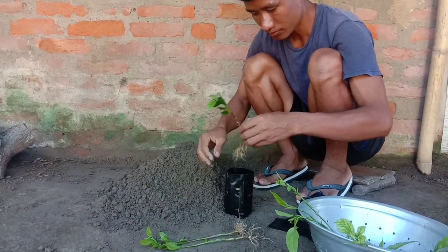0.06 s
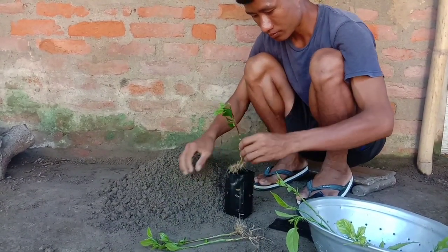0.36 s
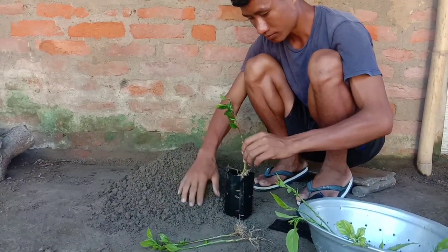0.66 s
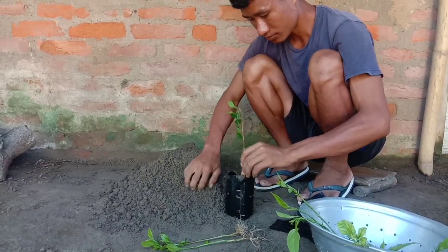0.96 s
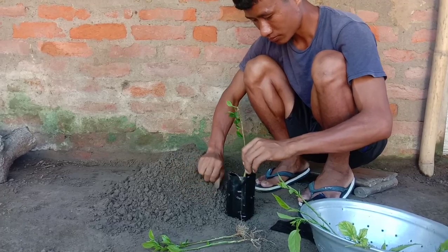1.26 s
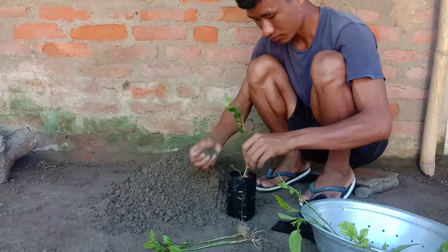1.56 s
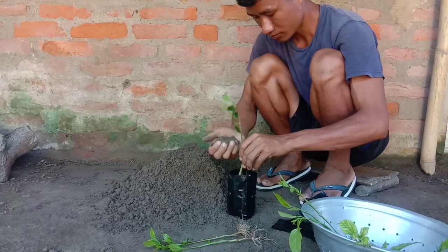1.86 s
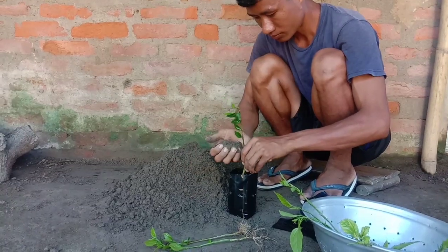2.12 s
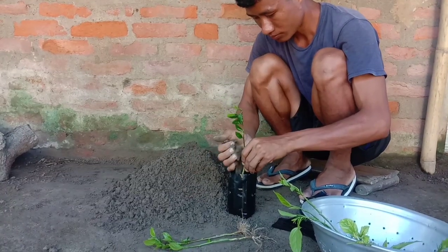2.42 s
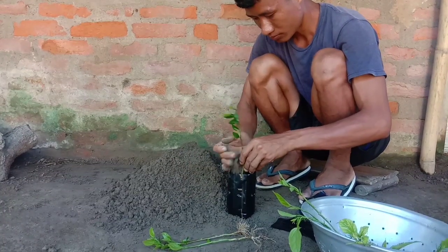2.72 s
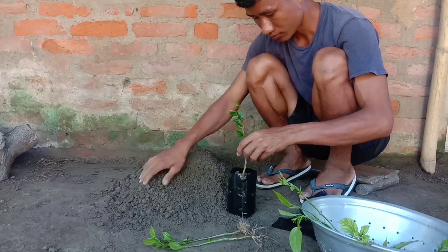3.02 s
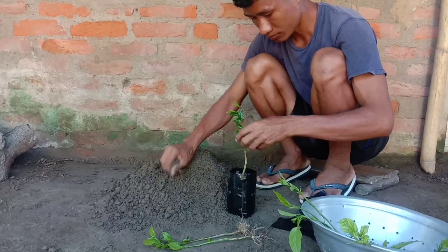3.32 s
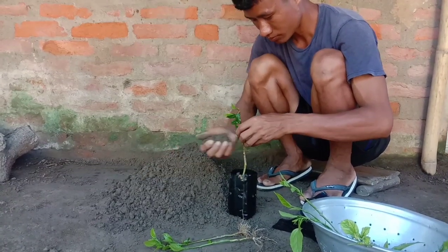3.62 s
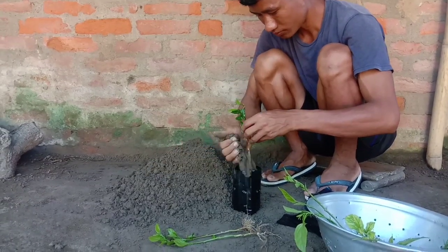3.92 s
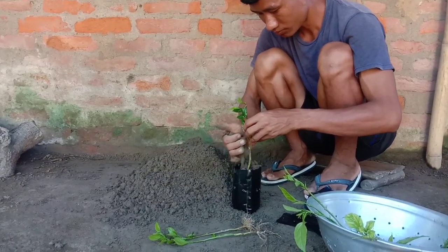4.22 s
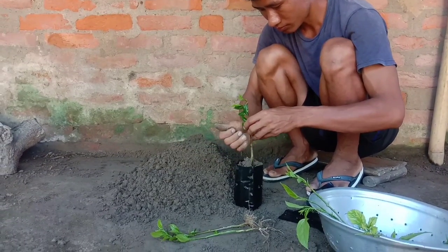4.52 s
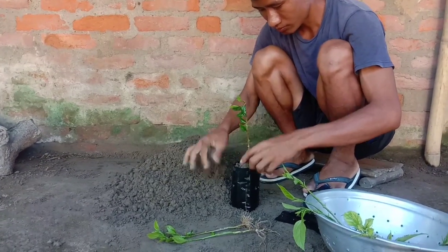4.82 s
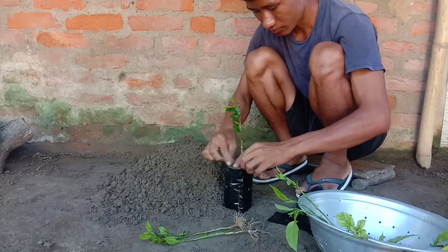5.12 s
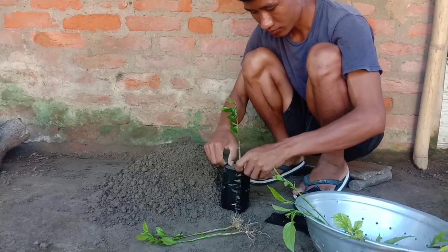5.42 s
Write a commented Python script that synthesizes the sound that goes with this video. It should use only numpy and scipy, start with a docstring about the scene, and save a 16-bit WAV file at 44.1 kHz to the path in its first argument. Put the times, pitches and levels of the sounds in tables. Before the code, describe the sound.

From start to finish, about five and a half seconds, a small bird repeats a sharp falling chip roughly four times a second, steady in level, with tight echoes off garden walls. Close by, hands scoop and crumble loose soil in soft, uneven, gritty strokes, busiest from 2.5 to 4.2 seconds. A thin plastic planting bag gives short bright crinkles near 0.5, 1, 1.6 to 2, 4, 4.5 and 5 seconds. Hands and clods thud softly on packed earth at 1 second and most clearly at 3.6. Faint high peeps and twitter come in the first 1.3 seconds and again from 3.7 to 4.6. Distant birds hoot briefly, mostly after 3.6 seconds. From 4.8 seconds a second bird answers with about five thin, slightly raspy falling whistles. Faint shrill insects, a soft hush and a wandering low rumble lie underneath. The sound is almost mono.

```python
"""A walled garden: a small bird repeats one sharp falling chip about four times a second, each a pure
glide that beats against its echoes off ground and walls. A thin whistler answers late.
Close by, hands scoop loose soil and crumble it into a plastic planting bag: grains rub and hiss,
clods knock softly, the bag crinkles. Faint peeps, far hoots, insects and a low rumble lie behind.
The sound is almost mono."""
import sys
import numpy as np
from scipy import signal
from scipy.fft import rfft, irfft
from scipy.io import wavfile
from scipy.ndimage import uniform_filter1d

SR = 44100
rng = np.random.default_rng(int(sys.argv[2]) if len(sys.argv) > 2 else 0)


def store_wav(level_fs):
    """Save 16-bit WAV to argv[1]."""
    pcm = np.round(np.clip(np.atleast_2d(level_fs), -1, 1) * 32767)
    wavfile.write(sys.argv[1], SR, pcm.T.astype(np.int16))


N = 245637
TIME = np.arange(N) / SR


# the lead bird's chips: t/s, level/dB, pitch/ratio, extra bend over the fall/ratio
CHIP_CUES = [(0.1898, -39.9, 0.992, 0.011), (0.4739, -39.2, 1.01, 0.01), (0.7326, -40.0, 0.993, -0.006),
             (1.0133, -40.2, 0.992, 0.006), (1.2725, -39.5, 0.996, -0.001), (1.5233, -39.7, 0.993, 0.009),
             (1.7992, -39.4, 0.997, 0.038), (2.0513, -40.5, 0.979, -0.022), (2.3358, -39.5, 1.004, -0.009),
             (2.601, -40.1, 1.0, -0.018), (2.8548, -40.3, 0.99, 0.008), (3.1395, -40.0, 0.991, 0.001),
             (3.3982, -39.0, 1.007, -0.004), (3.6646, -39.8, 1.0, -0.01), (3.9214, -39.8, 0.988, 0.035),
             (4.1877, -39.8, 1.005, -0.031), (4.4501, -39.4, 1.024, -0.026), (4.7247, -41.4, 0.972, 0.054),
             (4.9785, -38.5, 1.02, -0.03), (5.2329, -37.3, 1.003, 0.025), (5.5006, -38.8, 1.03, -0.013)]
def chipping_bird(boost_db=4.5, lead_s=.0125):
    """A run of near-identical chips, each led in by a thin slur."""
    song, drift = np.zeros(N), 1 + .003 * walk(300)
    for s, db, pitch, slope in CHIP_CUES:
        add(song, s - lead_s, undb(db) * lead_in(pitch, lead_s))
        add(song, s, undb(db + boost_db) * chip(pitch, slope, np.roll(drift, -int(s * SR))))
    out = reflections(song)
    # the song is already under way: open on the ring-out of a chip
    add(out, 0, out[int(.255 * SR):int(.44 * SR)].copy())
    return out


def chip(pitch, slope, drift, rest_hz=1952, attack_s=.0018, fall_s=.0435, trail_s=.036):
    """A whistle plunges, sags toward a resting pitch as it fades, flicks up and leaves a faint trail."""
    t = TIME[:int((fall_s + trail_s) * SR)]
    plunge_hz = 1350 * np.exp(-t / .00199)
    sag_hz = 1103 * np.exp(-t / .0235)
    flick = np.exp(-((t - .0421) / .0018) ** 2)
    hz = rest_hz + plunge_hz + sag_hz + 140 * flick
    bend = 1 + slope * (np.minimum(t / fall_s, 1) - .3)
    fade_db = -390 * np.minimum(t, fall_s)
    trail_db = -7 * np.clip((t - fall_s) / attack_s, 0, 1)
    gate = np.minimum(t / attack_s, 1) * np.sqrt(np.clip((t[-1] - t) / trail_s, 0, 1))
    return tone(pitch * bend * hz * drift[:len(t)], undb(fade_db + 11 * flick + trail_db) * gate)


def lead_in(pitch, length_s, start_hz=5960, end_hz=4108):
    """A thin slur that falls ever faster and grows until the chip takes over."""
    n = int(length_s * SR)
    hz = start_hz + (end_hz - start_hz) * np.linspace(0, 1, n) ** 1.75
    gain = undb(np.linspace(-21, -6, n)) * signal.windows.tukey(n, .15)
    return tone(pitch * hz, gain)


# early reflections off ground and walls: delay/s, level/dB
WALL_TAPS = [(.00138, -9.1), (.00227, -7.5), (.00638, -5.7), (.00869, -8.9), (.01097, -11.4),
             (.01275, -10.3), (.01671, -11.6), (.01792, -11), (.01923, -9.2), (.02165, -11),
             (.03493, -12.6), (.04737, -11.1)]
def reflections(song, leaves_hz=2750, weak_taps=7):
    """Echoes overlap each glide and make it beat; leaves scatter mostly its high start."""
    bright = 2 * signal.sosfilt(signal.butter(3, leaves_hz, "highpass", fs=SR, output="sos"), song)
    out = song + scatter(bright, wet_db=-5.5)
    for delay, db in WALL_TAPS:
        add(out, delay, undb(db) * song)
    for k, chance in enumerate(rng.random(weak_taps)):  # smaller surfaces, 14-36 ms late
        add(out, .014 + .022 * (k + chance) / weak_taps, undb(-16) * song)
    return out


# EQ of dull, crumbling soil: f/Hz, level/dB
SCRAPE_EQ = [(120, -40), (230, -15.5), (320, 1), (370, 2), (440, 3.5), (520, -2.5), (780, -3), (950, -2.5),
             (1150, -0.5), (1500, -3.5), (2000, -4), (4000, -12.5), (7500, -43), (11000, -49)]
# EQ of bright grit, also used for the bag: f/Hz, level/dB
GRIT_EQ = [(1500, -15), (3200, -12.5), (4500, -4), (6200, 7), (7500, 2.5), (9000, -13), (11500, -26.5),
           (15500, -28)]
# hand strokes through the soil: peak t/s, length/s, scrape level/dB, grit level/dB
HAND_STROKES = [(0.262, 0.085, -62, -61), (0.518, 0.11, -74, -54), (0.636, 0.038, -58, -52.5),
                (0.757, 0.2, -78, -59), (1.002, 0.13, -59.5, -54.5), (1.094, 0.16, -61.5, -56),
                (1.283, 0.24, -69.5, -57.5), (1.54, 0.15, -69, -55), (1.815, 0.17, -62, -49.5),
                (1.988, 0.076, -65.5, -57), (2.076, 0.088, -65.5, -52), (2.385, 0.2, -65, -53.5),
                (2.543, 0.063, -59, -52), (2.766, 0.071, -54.5, -50), (2.816, 0.11, -54.5, -48.5),
                (2.951, 0.33, -60, -55), (3.45, 0.12, -82, -54.5), (3.589, 0.041, -51, -66),
                (3.663, 0.21, -54.5, -51.5), (3.934, 0.079, -57, -50.5), (4.02, .16, -53, -49.5),
                (4.157, 0.47, -68.5, -56), (4.405, 0.064, -57.5, -66), (4.528, 0.21, -67.5, -57.5),
                (4.817, 0.19, -72, -57.5), (4.925, 0.037, -69, -60.5), (5.01, 0.093, -64.5, -54.5),
                (5.133, 0.031, -57.5, -55), (5.247, 0.043, -85, -53), (5.346, 0.065, -59, -55),
                (5.53, 0.21, -60.5, -58)]
def soil(scrape_db=-1, grit_db=-3, lumpy_db=3):
    """Crumbs rub past each other in small slips: dull grains from the heap, bright ones from sand."""
    scrape = colour(grains(rate=9000, spread_db=1), SCRAPE_EQ) * undb(lumpy_db * walk(70) + scrape_db)
    grit = colour(grains(rate=7000, spread_db=1), GRIT_EQ) * undb(1.5 * walk(110) + grit_db)
    return sum(swell(s, length, rise_share=.41) * (undb(dull_db) * scrape + undb(hiss_db) * grit)
               for s, length, dull_db, hiss_db in HAND_STROKES)


# crinkles of the bag: t/s, level/dB, t60/s
CRINKLE_CUES = [(0.4803, -37.5, 0.079), (0.5302, -41, 0.057), (0.624, -40, 0.069), (0.9856, -33, 0.047),
                (1.635, -37.5, 0.024), (1.7804, -38, 0.065), (1.8193, -44, 0.077), (1.954, -42, 0.093),
                (2.0157, -37, 0.076), (2.582, -42, 0.21), (2.7786, -54, 0.06), (2.826, -43, 0.026),
                (3.997, -37, 0.05), (4.0452, -36, 0.06), (4.418, -36, 0.076), (4.4553, -29, 0.036),
                (4.9272, -44, 0.088), (4.992, -32, 0.036), (5.1244, -30.5, 0.04), (5.3213, -47, 0.099)]
def plastic_bag(trim_db=-10, attack_s=.0025):
    """The thin plastic gives short bursts of bright crackle."""
    out, t = np.zeros(N), TIME[:SR // 3]
    crackle = colour(grains(rate=9000, spread_db=1.5), GRIT_EQ)
    for s, db, t60 in CRINKLE_CUES:
        burst = undb(db + trim_db) * np.minimum(t / attack_s, 1) * decay(t, t60)
        add(out, s, np.roll(crackle, -int(s * SR))[:len(t)] * burst)
    return out


# body of a thud on packed earth: f/Hz, level/dB, t60/s
THUD_MODES = [(114, -1, 0.13), (195, 10, 0.031), (237, -6.5, 0.18), (420, -24, 0.052)]
# soft hits: t/s, crumb level/dB, crumb t60/s, thud level/dB
KNOCK_CUES = [(0.231, -78, 0.41, -74), (0.531, -54.5, 0.096, -78), (0.998, -55.5, 0.4, -46.5),
              (1.821, -52, 0.11, -58), (2.53, -52.5, 0.21, -79), (2.763, -67, 0.096, -53),
              (2.821, -59, .08, -56), (2.932, -41.5, 0.046, -74), (3.564, -56, 0.17, -35),
              (3.656, -55, 0.093, -45), (3.934, -60, 0.47, -76), (4.417, -75, 0.17, -57),
              (4.973, -47, 0.037, -77), (5.133, -51, 0.069, -77), (5.333, -53.5, 0.058, -78)]
def knocks(attack_s=.0074):
    """Hand and clods land on packed earth: a soft thud with a spill of crumbs."""
    out, t = np.zeros(N), TIME[:SR // 3]
    thud = sum(undb(db) * np.sin(2 * np.pi * hz * t) * decay(t, t60) for hz, db, t60 in THUD_MODES)
    for s, crumbs_db, t60, thud_db in KNOCK_CUES:
        crumbs = colour(noise(len(t)), SCRAPE_EQ) * undb(crumbs_db) * decay(t, t60)
        add(out, s, (crumbs + undb(thud_db) * thud) * np.minimum(t / attack_s, 1))
    return out


# the answering phrase: t/s, length/s, start f/Hz, end f/Hz, level/dB
WHISTLE_NOTES = [(4.79, 0.14, 5360, 3844, -43.5), (4.795, 0.035, 7600, 7200, -54.5),
                 (4.98, 0.13, 5160, 3385, -43), (5.048, 0.045, 7860, 7450, -59),
                 (5.15, 0.12, 4910, 3780, -41.5), (5.227, 0.033, 7760, 7250, -57.5),
                 (5.353, 0.05, 4840, 4490, -43), (5.385, 0.065, 4500, 3860, -36.5),
                 (5.427, 0.036, 7650, 7160, -52.5), (5.545, 0.063, 4950, 4200, -40)]
def whistler():
    """A second bird answers with thin, slightly raspy falling whistles."""
    song = slurs(WHISTLE_NOTES, waver=.02, rate=600)
    return song + scatter(song, wet_db=-3)


# faint high peeps: t/s, level/dB
PEEP_CUES = [(0.056, -61), (0.274, -49.5), (.68, -53.5), (0.898, -52.5), (.935, -51), (1.122, -52),
             (1.16, -51.5), (3.691, -49.5), (3.874, -52), (4.097, -51.5), (4.135, -51), (4.316, -50),
             (4.363, -52.5), (4.534, -54)]
def peeps(length_s=.0282, start_hz=5950, end_hz=5200):
    """Tiny raspy down-glides, blurred by distance."""
    song = slurs([(s, length_s, start_hz, end_hz, db) for s, db in PEEP_CUES], waver=.04, rate=900)
    return song + scatter(song, wet_db=-2)


# distant calls: t/s, length/s, start f/Hz, end f/Hz, level/dB
HOOT_NOTES = [(0, 0.071, 662, 614, -69), (1.16, 0.082, 1272, 1224, -58.5), (2.36, 0.11, 1236, 1131, -60.5),
              (3.655, 0.073, 1260, 1200, -54.5), (3.7, 0.089, 1338, 1230, -46),
              (3.975, 0.086, 1043, 1043, -50.5), (4.18, 0.051, 1048, 964, -58.5),
              (4.2, 0.082, 1460, 1515, -63.5), (4.515, 0.089, 1162, 1206, -55), (4.63, 0.11, 613, 604, -69),
              (4.71, 0.093, 1226, 1276, -61), (4.875, 0.14, 1336, 1221, -54.5),
              (5.17, 0.097, 1487, 1538, -60), (5.3, 0.098, 1518, 1344, -53.5)]
def hoots(boost_db=1):
    """Far birds hoot on nearly level pitches; much of it arrives as scatter."""
    song = slurs(HOOT_NOTES, waver=.01, rate=120)
    return undb(boost_db) * (song + scatter(song, wet_db=-2))


# bouts of twitter behind the peeps: start t/s, end t/s, level/dB
TWITTER_BOUTS = [(0.242, 0.452, -62), (0.663, 1.27, -59), (3.85, 4.6, -59)]
def twitter(notes_per_s=44, note_s=.0305, start_hz=5900, end_hz=5160, spread_db=3):
    """Quick high notes from far off, loose in timing and level."""
    beats = [(s, db) for start, end, db in TWITTER_BOUTS for s in np.arange(start, end, 1 / notes_per_s)]
    notes = [(s + late / notes_per_s / 4, note_s, start_hz, end_hz, db + spread_db * louder)
             for (s, db), (late, louder) in zip(beats, noise((400, 2)))]
    song = slurs(notes, waver=.02, rate=900)
    return .5 * song + scatter(song, wet_db=-9)


# envelope of the garden's reverb: delay/s, level/dB
REVERB_ENVELOPE = [(0, -8), (.012, -2), (.035, -3), (.07, -2), (.1, -7), (.15, -15), (.22, -25), (.45, -52)]
def scatter(x, wet_db):
    """Leaves and walls return the sound as a short diffuse tail."""
    envelope = undb(curve(REVERB_ENVELOPE)[:SR // 2])
    tail = noise(len(envelope)) * envelope
    return undb(wet_db) * signal.fftconvolve(x, tail / np.linalg.norm(tail))[:N]


# fader ride of the shrill insect: t/s, level/dB
INSECT_RIDE = [(0, -68.5), (.2, -65), (.3, -94), (2.3, -79), (3.1, -70.5), (4.5, -70), (5.57, -69.5)]
def insects(chorus_db=-67):
    """Two flickering bands of noise: one narrow and shrill, one a broader chorus."""
    shrill = noise_band(hz=8970, width=330) * undb(curve(INSECT_RIDE) + 2 * walk(25))
    chorus = noise_band(hz=7270, width=1000) * undb(chorus_db + 4.1 * walk(8.3))
    return shrill + chorus


# low-end swells: peak t/s, length/s, level/dB
RUMBLE_SWELLS = [(0.125, 0.34, -52.5), (0.796, 0.1, -58), (1.163, 0.78, -59.5), (1.926, .22, -60),
                 (2.327, 0.074, -54), (2.865, 0.12, -54.5), (4.32, 0.14, -56.5), (4.738, 0.11, -52),
                 (5.093, 0.11, -59), (5.449, 0.12, -49)]
def rumble(steady_db=-69.5, swell_trim_db=-3):
    """A low rumble that wanders in level and now and then swells into a hum."""
    bed = noise_band(hz=115, width=99) * undb(steady_db + 2 * walk(8))
    hum = unit(resonate(noise_band(hz=114, width=125), hz=114, width=125))
    swells = sum(undb(db) * swell(s, length, rise_share=.49) for s, length, db in RUMBLE_SWELLS)
    return bed + hum * swells * undb(swell_trim_db)


# EQ of the air bed: f/Hz, level/dB
AIR_EQ = [(30, -10), (70, 13), (150, 12), (330, 4.5), (520, 1.5), (900, -1.5), (1800, 1.5), (2500, 3),
          (4000, -8.5), (5000, -8.5), (6200, 6.5), (8000, -38), (9600, -11.5), (10300, -5.5), (11300, -21),
          (13800, -22), (15400, -11)]
def still_air(air_db=-67, tone_db=-72, side_db=-78):
    """A soft hush with a wavering far-off tone and a trace of stereo width."""
    hush = colour(noise(), AIR_EQ) * undb(air_db + .5 * walk(2.35))
    far_tone = noise_band(hz=1181, width=107) * undb(tone_db + 1.8 * walk(3.9))
    side_eq = [(50, 7), (120, 5), (300, 4), (600, -1), (1200, 10), (2500, -17.5), (5000, -5.5),
               (9000, -41), (15000, -3.5)]  # f/Hz, level/dB
    return hush + far_tone + side(colour(noise(), side_eq) * undb(side_db))


def slurs(notes, waver, rate):
    """Whistled glides that swell and fade; a fast waver of the pitch makes them raspy."""
    out, drift = np.zeros(N), 1 + waver * walk(rate)
    for s, length, start_hz, end_hz, db in notes:
        n = int(length * SR)
        hz = np.geomspace(start_hz, end_hz, n) * np.roll(drift, -int(s * SR))[:n]
        add(out, s, tone(hz, undb(db) * signal.windows.tukey(n, .8)))
    return out


def tone(hz, gain):
    """A pure whistle on a moving pitch."""
    return gain * np.sin(2 * np.pi * np.cumsum(hz) / SR)


def grains(rate, spread_db):
    """Random tiny clicks, a few larger than the rest."""
    clicks = (rng.random(N) < rate / SR) * noise()
    return clicks * undb(spread_db * np.minimum(rng.exponential(size=N), 4))


def noise(size=N):
    """White noise."""
    return rng.standard_normal(size)


def noise_band(hz, width):
    """A band of noise around hz; rms 1."""
    return unit(resonate(noise(), hz, width))


def resonate(x, hz, width):
    """A steep resonance: one band-pass applied twice."""
    b, a = signal.iirpeak(hz, hz / width, fs=SR)
    return signal.lfilter(b, a, signal.lfilter(b, a, x))


def colour(x, eq):
    """Shape x by (f/Hz, level/dB) points, rolling off beyond both ends; rms 1."""
    hz, db = np.transpose(eq)
    f = np.fft.rfftfreq(len(x), 1 / SR) + 1
    skirts = np.minimum(f / hz[0], 1) ** 2 * np.minimum(hz[-1] / f, 1) ** 2
    gain = undb(np.interp(np.log(f), np.log(hz), db))
    return unit(irfft(rfft(x) * skirts * gain, len(x)))


def walk(rate):
    """Random modulation, gliding to a new value rate times a second; rms 1."""
    hold = int(SR / rate)
    steps = np.repeat(noise(N // hold + 1), hold)
    return unit(uniform_filter1d(steps, hold)[:N])


def swell(s, length, rise_share):
    """A rounded rise and fall, peaking at 1 at time s."""
    out, near = np.zeros(N), np.abs(TIME - s) < 2 * length
    t = TIME[near] - s
    out[near] = 1 / np.cosh(2 * t / (length * np.where(t < 0, rise_share, 1 - rise_share)))
    return out


def decay(t, t60):
    """A fade of 60 dB every t60 seconds."""
    return np.exp(-np.log(1000) * t / t60)


def curve(points):
    """Timed points joined by straight lines."""
    return np.interp(TIME, *np.transpose(points))


def add(track, s, x):
    """Mix x into the track at time s."""
    i = max(int(round(s * SR)), 0)
    track[i:i + len(x)] += x[:max(N - i, 0)]


def side(x):
    """Left and right in opposite polarity."""
    return x * np.array([[1], [-1]])


def undb(db):
    """Decibels to gain."""
    return 10 ** (np.asarray(db) / 20)


def unit(x):
    """Scale to rms 1."""
    return x / np.sqrt(np.mean(x ** 2))


def scene():
    """Birds and handwork in the centre, the garden around them; the near wall returns the handwork once."""
    hands = soil() + plastic_bag() + knocks()
    birds = chipping_bird() + whistler() + peeps() + hoots() + twitter()
    wall = np.zeros(N)
    add(wall, .0052, undb(-13.5) * hands)
    ambience = insects() + rumble() + still_air()
    return birds + hands + wall + ambience + side(scatter(birds, wet_db=-40))


def record(dry, notch_hz=6620, notch_width_hz=450, notch_depth=.65, top_hz=15500, fade_in_s=.004):
    """The microphone port cuts a narrow notch; the top is cut off steeply."""
    b, a = signal.iirpeak(notch_hz, notch_hz / notch_width_hz, fs=SR)
    notched = dry - notch_depth * signal.lfilter(b, a, dry)
    faded = notched * np.minimum(TIME / fade_in_s, 1)
    return signal.sosfilt(signal.ellip(10, .2, 70, top_hz, fs=SR, output="sos"), faded)


dry = scene()
out = record(dry)
store_wav(out)
```